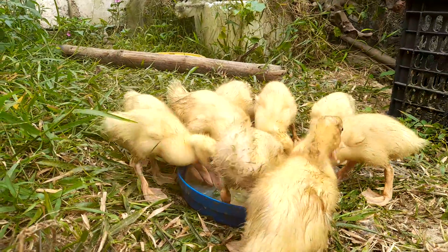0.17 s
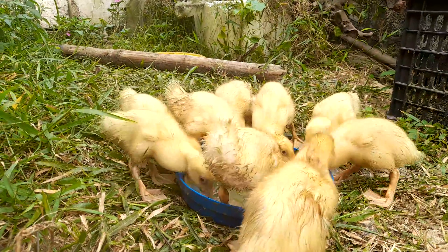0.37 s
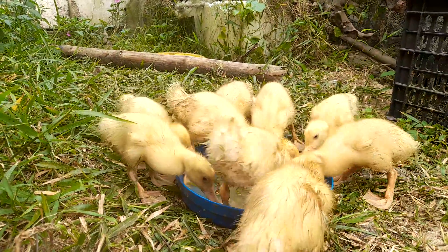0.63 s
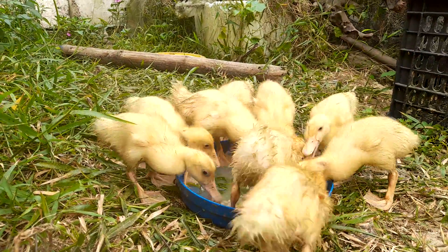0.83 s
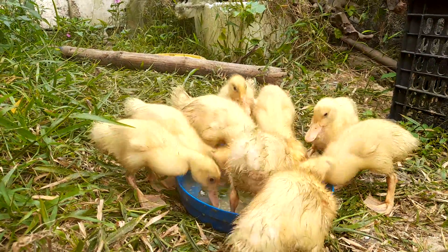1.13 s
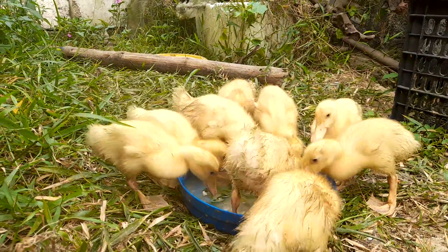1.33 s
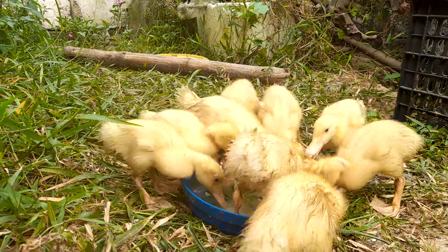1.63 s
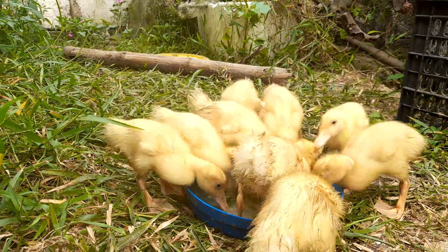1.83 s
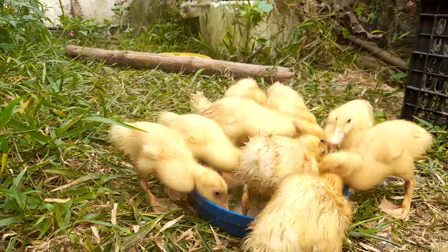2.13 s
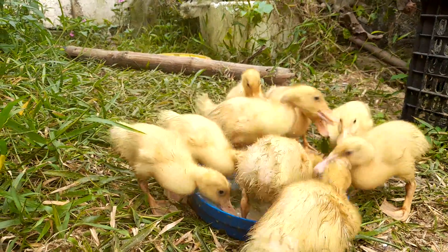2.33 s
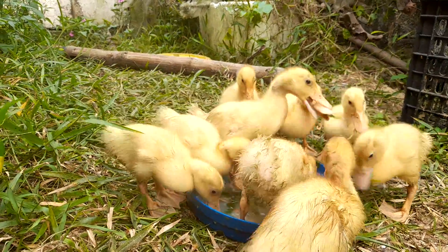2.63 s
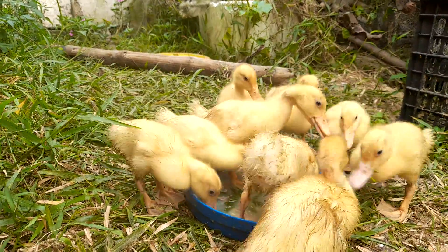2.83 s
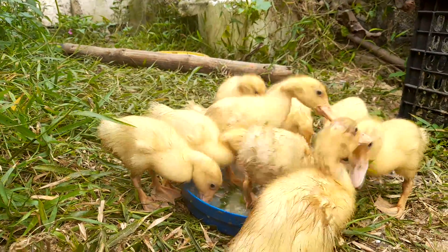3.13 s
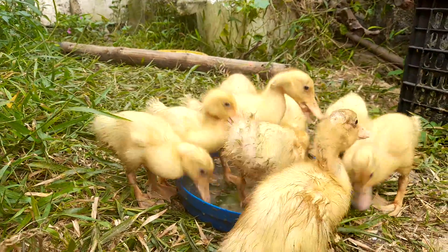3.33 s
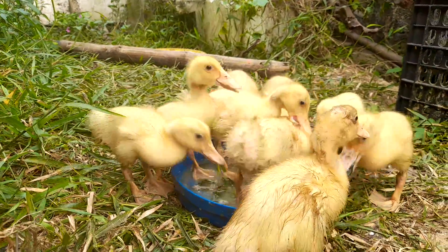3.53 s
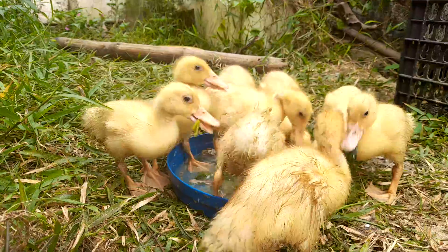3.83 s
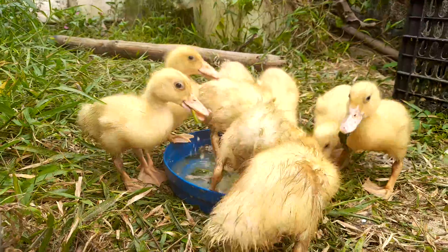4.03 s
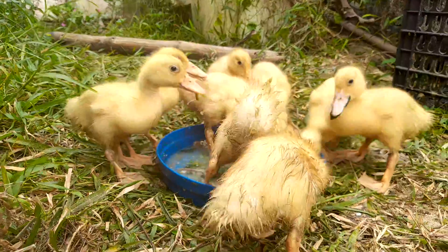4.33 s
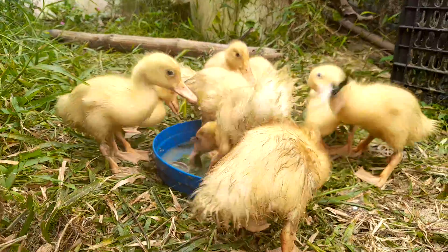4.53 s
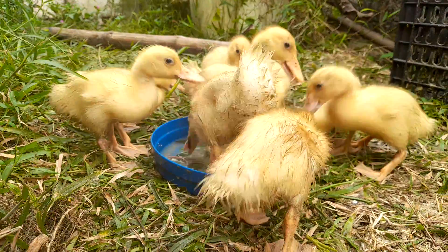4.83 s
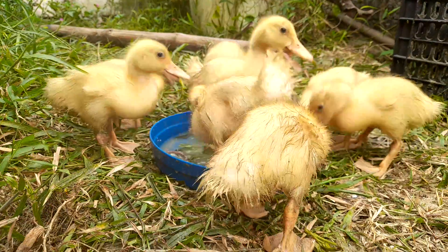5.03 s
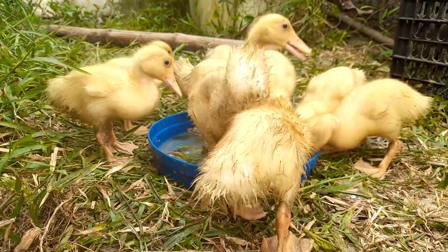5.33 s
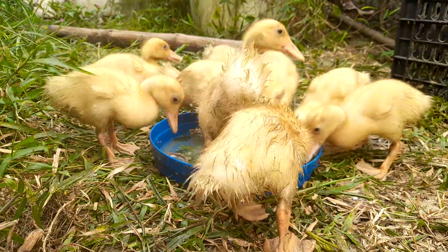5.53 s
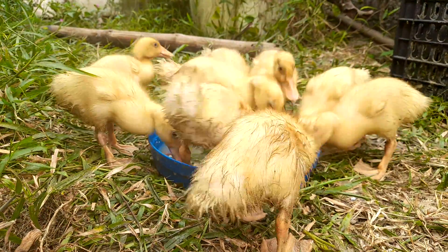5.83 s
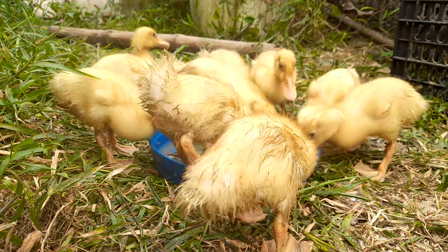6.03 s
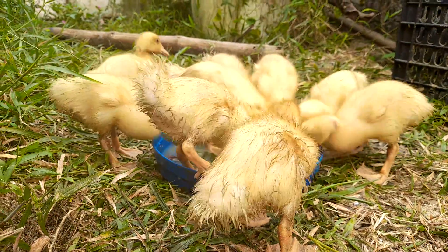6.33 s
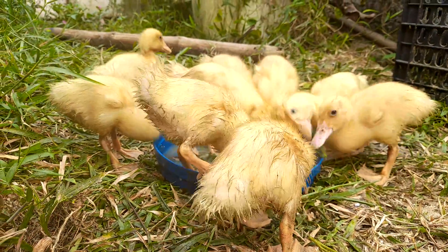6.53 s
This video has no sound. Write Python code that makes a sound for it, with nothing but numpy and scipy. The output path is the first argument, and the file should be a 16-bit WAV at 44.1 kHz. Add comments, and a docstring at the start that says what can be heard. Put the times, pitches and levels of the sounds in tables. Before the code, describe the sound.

From the start, a crowd of ducklings dabbles noisily in a plastic bowl about a metre from a stereo microphone. Dense, very short wet smacks and bright ticks mix with nibbling, fine spray, sloshing, light bowl knocks and small rising bubble plops. Between 0.6 and 1.0 s, five quick, thin two-voiced peeps chirp slightly to the right. The sloshing lessens after 1.3 s, and from about 2 to 3.2 s only sparse clicks and soft dabbling remain. Faint peeps come at 3.2 and 3.5 s, with a splashy plop near 3.4 s. Smacking grows again from 3.8 to 5 s, eases briefly, then two clearer peeps sound at 5.6 and 5.7 s amid renewed sloshing. Wet clicks and spray gather again at 6.4 to 6.7 s. Underneath lie faint outdoor hiss, low rumble, a distant wavering engine drone strongest near 5.8 s, and barely audible far animal calls.

```python
"""Wet bills smack and dabble close by: ducklings crowd round a plastic bowl of water on a lawn,
about a metre from a stereo microphone. Noise bursts ring the bills and bowl, grains of noise make the dabbling,
rising sines make bubbles plop, and paired whistles make the short two-voiced peeps.
Behind them lie a faint outdoor hiss, a few far animal calls, low rumble and the drone of a distant engine."""
import sys
import numpy as np
from scipy import signal
from scipy.fft import rfft, irfft, next_fast_len
from scipy.io import wavfile
from scipy.ndimage import uniform_filter1d

SR = 44100
rng = np.random.default_rng(int(sys.argv[2]) if len(sys.argv) > 2 else 0)


def pcm_store(signal):
    """Save signal as 16-bit PCM."""
    levels = np.round(np.clip(np.atleast_2d(signal), -1, 1) * 32767)
    wavfile.write(sys.argv[1], SR, levels.astype(np.int16).T)


N = 295029
TIME = np.arange(N) / SR

# Loud bill smacks; tick and knock levels are before the trims in smacks():
# start_s, hollow_level_db, hollow_pitch_hz, tick_level_db, bowl_knock_level_db, decay_ms
SMACK_EVENTS = [(.0314, -48, 3560, -43, -65, 0.9), (.0658, -35.5, 3720, -41, -57, 0.59),
                (.117, -66, 4100, -40, -65, 1.1), (.153, -45.5, 3140, -36.5, -46.5, 1.5),
                (.163, -45.5, 3400, -36, -54, 1), (.225, -46, 4000, -54, -66, 0.64),
                (.2506, -44.5, 2980, -41.5, -66, 1.6), (.2575, -44.5, 4200, -47, -73, 1.6),
                (.2976, -42.5, 4170, -47, -50, 2.1), (.3357, -56, 4450, -45, -52, 2.4),
                (.3541, -46.5, 3800, -36.5, -47, 1.3), (.3822, -40.5, 4000, -53, -58, 1.3),
                (.468, -49.5, 3850, -43, -67, 1.2), (.494, -37.5, 4080, -46, -51, .9),
                (.5314, -44.5, 3800, -53, -56, 1.2), (.5595, -43.5, 3900, -61, -57, 1.7),
                (.6767, -40.5, 3950, -39.5, -63, 1.3), (.6837, -42, 3840, -43.5, -71, 4.6),
                (.7573, -49, 2680, -70, -49, 1.6), (.782, -44, 3270, -48, -52, 1.5),
                (.7952, -55, 3810, -41, -69, 1.2), (.8437, -41, 4700, -38, -49, 2.3),
                (.8919, -45, 4100, -40, -55, 6.1), (.9296, -38, 3350, -44, -55, 1.3),
                (.9517, -52, 4650, -48, -74, 1.7), (1.0114, -64, 3290, -33, -53, 0.62),
                (1.0383, -34.5, 2950, -45, -45, .8), (1.0714, -36.5, 4000, -30.5, -51, 1.4),
                (1.1071, -43, 4370, -63, -68, 0.63), (1.1253, -53, 3630, -40, -52, .7),
                (1.152, -43.5, 3310, -36.5, -47.5, 2.4), (1.1839, -41, 3900, -62, -61, 0.74),
                (1.233, -45, 3300, -65, -55, 2.1), (1.2924, -68, 5340, -40, -59, 0.7),
                (1.3817, -55, 3390, -46.5, -61, .6), (1.4668, -62, 5020, -29.5, -64, .6),
                (1.523, -47.5, 3930, -34.5, -57, 0.42), (1.573, -76, 5680, -42, -68, .5),
                (1.625, -41, 4670, -37.5, -57, 0.47), (1.644, -56, 3800, -43, -60, .9),
                (1.6822, -75, 4570, -43.5, -59, .5), (1.709, -43, 3450, -63, -56, 4),
                (1.7254, -49, 3340, -44, -51.5, 0.58), (1.7365, -46.5, 2930, -34, -59, 0.77),
                (1.7685, -42.5, 3940, -50, -49, 6.9), (1.9143, -51, 3100, -51, -54, 3.6),
                (1.9602, -65, 4120, -42.5, -72, 1.9), (1.9927, -38.5, 3720, -63, -63, 0.7),
                (2.0228, -45.5, 4030, -48, -73, 3.2), (2.4593, -54.5, 4400, -48, -86, 6.9),
                (2.5223, -41.5, 3460, -47, -54.5, .9), (2.663, -51.5, 3850, -52, -61, 0.79),
                (2.7636, -48, 6360, -48, -60, 2.3), (2.9793, -47.5, 5900, -39.5, -71, 1.4),
                (3.0069, -44, 3500, -51, -55.5, 1.6), (3.1332, -51, 3150, -54, -78, 1.8),
                (3.347, -50, 3260, -46, -65, 3), (3.3635, -43, 2350, -50, -49, 2.2),
                (3.824, -44, 4500, -34, -54, .9), (3.9294, -45.5, 3320, -52, -59, 1.3),
                (3.98, -45.5, 3440, -53.5, -68, 9.6), (4.0365, -49.5, 4520, -53, -69, 1.9),
                (4.2194, -52, 5170, -49, -53, .8), (4.2547, -47.5, 4420, -48, -61, 1.6),
                (4.3315, -52, 3820, -37.5, -55, .4), (4.3946, -56, 5000, -43, -62, 7.1),
                (4.4904, -48, 4150, -61, -72, 2), (4.6186, -50, 3650, -42, -50, 1.3),
                (4.648, -42.5, 4040, -49, -50, 0.9), (4.677, -53, 4430, -44.5, -56, .7),
                (4.8344, -51, 3520, -55, -46.5, 0.9), (4.8657, -32.5, 4720, -37.5, -52, 0.37),
                (4.92, -40.5, 3100, -58, -66, 3), (4.958, -42, 5030, -44, -55.5, 10),
                (4.981, -39.5, 3650, -51, -48, 1.4), (5.1058, -50, 3880, -45.5, -54.5, 5),
                (5.131, -48, 4170, -56, -49, 1.5), (5.4055, -48, 4460, -56, -68, 1.2),
                (5.4754, -40.5, 5540, -49, -58, 1.5), (5.609, -33, 4930, -36.5, -48, 0.65),
                (5.624, -44, 4760, -60, -77, 1.1), (5.78, -45.5, 3900, -59, -55, 1.9),
                (5.7935, -48.5, 4270, -37, -70, 0.7), (5.8818, -52, 4320, -40, -77, 1.2),
                (5.9346, -38.5, 3860, -44, -57, 2.6), (6.0965, -44.5, 3800, -60, -69, 1.9),
                (6.1152, -36.5, 4000, -61, -76, 1.9), (6.2213, -48, 4040, -53, -52.5, 1.2),
                (6.3285, -48.5, 3880, -55, -72, 2.5), (6.441, -44, 4130, -52, -53, 21),
                (6.4735, -45, 3430, -42, -49, 1.2), (6.483, -36, 2880, -57, -65, .6),
                (6.491, -37.5, 3300, -48, -50, 7.8), (6.528, -64, 4930, -38.5, -58, 0.82),
                (6.6379, -38, 4400, -45, -57, 6.4)]
# Pitch of the wet ticks, finer once the brood has shifted round the bowl: time_s, pitch_hz
TICK_PITCH_CURVE = [(0, 10400), (1.1, 10400), (1.5, 9800), (4.3, 9800), (4.4, 11900), (6.69, 11900)]
# How busily the brood dabbles, before the trims in dabbling():
# time_s, slosh_level_db, nibble_level_db, spray_level_db
DABBLE_CURVE = [(0.0, -63, -55, -53.5), (0.43, -66.5, -57, -57.5), (0.74, -63, -52.5, -55.5),
                (0.95, -58, -53.5, -55), (1.36, -72, -57.5, -59.5), (1.64, -71, -59.5, -58),
                (2.03, -68.5, -61, -61), (2.35, -84, -68.5, -62.5), (3.26, -70.5, -62.5, -63.5),
                (3.71, -79, -70, -69), (4.13, -67, -59, -60), (4.58, -68, -56.5, -62),
                (4.77, -65.5, -60.5, -58), (5.16, -78.5, -66, -66), (5.4, -77.5, -63.5, -64.5),
                (5.7, -60, -55.5, -64.5), (6.39, -73, -62.5, -59.5), (6.69, -65.5, -53, -53)]
# Colour of the sloshing in the bowl: frequency_hz, level_db
SLOSH_COLOUR = [(250, 6), (500, -1.5), (800, 0), (1300, -1), (2000, 1), (3000, 5)]
# Colour of the nibbling in the bills: frequency_hz, level_db
NIBBLE_COLOUR = [(1200, -5), (2000, -1.5), (2800, 2.5), (3800, 4.5), (4700, -1), (5800, -5), (8000, -13.5)]
# Colour of the fine spray: frequency_hz, level_db
SPRAY_COLOUR = [(5000, -2), (6500, 3.5), (8700, -7), (9900, 1), (11500, -7), (14300, 0), (16000, -19)]
# Plops and sloshes in the bowl; splash is relative to the bubble, level is before the decay:
# start_s, level_db, starting_pitch_hz, decay_ms, splash_level_db
PLOP_EVENTS = [(.095, -41, 1100, 4.6, -3), (.36, -43.5, 1390, 10.4, 22), (.626, -42.5, 1136, 4.1, 1),
               (.752, -41, 880, 5, 5), (.784, -47, 850, 4.9, -13), (.888, -39, 670, 3.6, -6),
               (.893, -41.5, 298, 17.6, -3.5), (.93, -47, 450, 7.2, 8), (1.062, -45.5, 340, 11, 11),
               (1.14, -48, 1080, 16, 5), (1.902, -52.5, 690, 19, 23), (2.27, -45.5, 198, 10.3, 4),
               (3.362, -34, 1220, 2.5, 27), (3.895, -54, 560, 6.6, 16), (4.092, -43, 1210, 3.3, 3),
               (4.603, -38, 1080, 2.8, 17), (4.636, -46, 730, 5.9, 0), (4.64, -48, 420, 19, 23),
               (4.663, -52, 950, 17, 13), (5.693, -37.5, 993, 4.2, -15), (6.022, -44, 890, 6.3, 2.5),
               (6.038, -45, 1080, 6.1, -15), (6.49, -45, 1075, 8.5, 3), (6.629, -46.5, 1330, 12, 4)]
# Peeps; droop is the fall in pitch at both ends as a share of the top:
# start_s, top_s, end_s, top_pitch_hz, droop_share, level_db, second_to_first_pitch_ratio, second_level_db
PEEP_EVENTS = [(.579, .609, .641, 2770, .29, -38, 1.29, -5), (.694, .726, .762, 2850, .31, -32.5, 1.22, -8),
               (.818, .841, .900, 3100, .42, -33.3, 1.33, -10),
               (.841, .865, .898, 2940, .45, -37, 1.25, -15),
               (.971, .996, 1.023, 2970, .4, -36.5, 1.28, -12),
               (2.00, 2.02, 2.10, 2880, .14, -66, 1.3, -15), (2.07, 2.11, 2.19, 2260, .05, -69, 1.3, -15),
               (3.208, 3.230, 3.280, 2290, .22, -47, 1.6, -11),
               (3.480, 3.492, 3.556, 2740, .4, -49.5, 1.3, -14),
               (5.550, 5.579, 5.622, 2680, .38, -44.5, 1.28, -4),
               (5.705, 5.735, 5.773, 3000, .42, -39.5, 1.27, -2),
               (5.85, 5.89, 5.94, 2480, .05, -62, 1.2, -12), (6.11, 6.15, 6.25, 2830, .18, -61, 1.2, -14)]
# Faint far calls: start_s, length_s, start_pitch_hz, end_pitch_hz, level_db, roughness_0_to_1
FAR_CALL_EVENTS = [(2.551, 0.21, 1151, 975, -65, 0.27), (3.286, 0.24, 666, 540, -69, 0.14),
                   (5.608, 0.214, 636, 693, -70, .05), (5.633, 0.16, 495, 532, -65.5, 0.14)]
# Colour of the outdoor hiss: frequency_hz, level_db
AIR_COLOUR = [(250, 10), (400, -4), (700, -2.5), (1500, -12), (2300, -17), (3500, -2), (7000, -12),
              (10000, -4.5), (14000, -3), (15500, -15)]
# Colour of the low rumble: frequency_hz, level_db
RUMBLE_COLOUR = [(20, -30), (31, -26), (41, 7), (54, -5.5), (85, -3.5), (140, -8.5), (220, -13.5),
                 (320, -20), (520, -42.5)]
# Distant traffic, before the trims in outdoors(): time_s, rumble_level_db, drone_level_db
TRAFFIC_CURVE = [(0.0, -51.5, -63.5), (1.23, -53.5, -60), (1.6, -63, -62.5), (2.7, -62.5, -60.5),
                 (4.7, -56.5, -61.5), (5.2, -59.5, -60.5), (5.8, -56, -49.5), (6.32, -60, -61.5),
                 (6.69, -61, -56.5)]

# Stereo placing: level differences are left minus right
PEEP_PAN_DB, BILL_PAN_DB, BILL_PAN_SPREAD_DB = -7.5, -3.5, 1.5
LEFT_LAG_MS = 0.037
# Soft smacks fall at random, this far above the dabbling around them
SOFT_PER_S, SOFT_OVER_DB, SOFT_SPREAD_DB = 8, 7, 2
SOFT_HZ, SOFT_SCATTER, SOFT_DECAY_MS = 3940, .18, 1.2
TICK_SCATTER = .04  # spread of the tick's pitch, as a share
SPURTS_PER_S, SPURT_DB = 16, 2  # the bills work in short spurts
# A bubble's pitch climbs by this share of its start in each starting cycle, so small ones glide faster
RISE_PER_CYCLE = 0.0088
# Tiny bubbles burst at random among the bills
BUBBLES_PER_S, BUBBLE_HZ, BUBBLE_SCATTER, BUBBLE_CYCLES = 24, 3400, .24, 6
BUBBLE_OVER_DB, BUBBLE_SPREAD_DB, BUBBLE_SPLASH_DB = 11, 2.5, -1
DRONE_HZ = 122.6
TOP_HZ = 16000


def undb(db):
    """Decibels to gain."""
    return 10 ** (np.asarray(db) / 20)


def unit(x):
    """Scale to rms 1."""
    return x / np.sqrt(np.mean(x ** 2) + 1e-20)


def curves(table):
    """The columns of a table, joined by straight lines in time."""
    s, *columns = np.transpose(table)
    return [np.interp(TIME, s, column) for column in columns]


def colour(x, points):
    """Filter by a (Hz, dB) spectrum that falls away beyond its ends."""
    hz, db = np.transpose(points)
    size = next_fast_len(N)
    f = np.maximum(np.arange(size // 2 + 1) * SR / size, 1)
    ends = np.minimum(f / hz[0], 1) ** 2 * np.minimum(hz[-1] / f, 1) ** 2
    gains = ends * undb(np.interp(np.log(f), np.log(hz), db))
    return irfft(rfft(x, size) * gains, size)[..., :N]


def resonate(x, hz, q):
    """A resonance applied twice, for steep skirts."""
    b, a = signal.iirpeak(hz, q, fs=SR)
    once = signal.lfilter(b, a, x)
    return signal.lfilter(b, a, once)


def walk(rate):
    """Smooth random wander of rms near 1, with a fresh step this many times a second."""
    k = max(int(SR / rate), 2)
    steps = np.repeat(rng.standard_normal(N // k + 1), k)
    smooth = uniform_filter1d(uniform_filter1d(steps, k), k)
    return unit(smooth[:N])


def ears(width, size):
    """Noise for left and right: a common part plus an unrelated part."""
    common = rng.standard_normal(size)
    return (common + width * rng.standard_normal((2, size))) / np.hypot(1, width)


def pan(db):
    """Left and right gains for a level difference, left minus right."""
    return unit(undb(np.array([[db], [-db]]) / 2))


def add(out, s, sound):
    """Mix a sound in at time s."""
    i = int(s * SR)
    out[:, i:i + sound.shape[-1]] += sound[..., :N - i]


def smacks(rows, tick_trim_db=-1.0, knock_trim_db=-2, fizz_db=-9, fizz_spread_db=3,
           tail_db=-15, tail_ms=5, snap=1.0, width=1.0):
    """A water film snaps in the bill: a sharp burst and a spatter ring the bill, tiny bubbles and the bowl."""
    out = np.zeros((2, N))
    ms = np.arange(SR // 20) * 1000 / SR
    for s, hollow_db, hollow_hz, wet_db, bowl_db, decay_ms in rows:
        film, fizz, place = rng.standard_normal(3)
        tick_hz = np.interp(s, *np.transpose(TICK_PITCH_CURVE)) * np.exp(TICK_SCATTER * film)
        shape = np.exp(-ms / decay_ms) + undb(tail_db) * np.exp(-ms / tail_ms)
        # level dB, pitch Hz, sharpness Q
        parts = [(hollow_db, hollow_hz, 2.6),
                 (wet_db + tick_trim_db, tick_hz, 3.4),
                 (wet_db + fizz_db + fizz_spread_db * fizz, 14000, 3.0),
                 (bowl_db + knock_trim_db, 1550, 1.3)]
        sound = 0
        for db, hz, q in parts:
            # after the first millisecond the level jumps at random every 40 samples
            jumps = np.repeat(rng.standard_normal(len(ms)), 40)[:len(ms)]
            spatter = np.where(ms > 1, undb(4 * jumps), 1)
            burst = ears(width, size=len(ms)) * shape * spatter
            burst[:, 0] += snap
            sound = sound + undb(db) * unit(resonate(burst, hz, q))
        # each bill is in its own place, so its delay between the microphones differs
        lags = rng.integers(0, 2, 2)
        sound = np.array([np.pad(ear, (lag, 8 - lag)) for ear, lag in zip(sound, lags)])
        # levels hold for the first 10 ms, where nearly all the energy lies
        level = np.sqrt(10 / ms[-1])
        add(out, s, pan(BILL_PAN_DB + BILL_PAN_SPREAD_DB * place) * sound * level)
    return out


def soft_smacks():
    """Rows like those of SMACK_EVENTS, at loose intervals and as loud as the brood is busy."""
    slosh, nibble, spray = curves(DABBLE_CURVE)
    rows = []
    for k, chance in enumerate(rng.standard_normal((int(SOFT_PER_S * N / SR), 5))):
        s = np.clip((k + .5 + .5 * chance[0]) / SOFT_PER_S, 0, TIME[-1])
        around = np.array([np.interp(s, TIME, level) for level in (nibble, spray, slosh)])
        hollow_db, wet_db, bowl_db = around + SOFT_OVER_DB + SOFT_SPREAD_DB * chance[2:]
        hollow_hz = SOFT_HZ * np.exp(SOFT_SCATTER * chance[1])
        rows.append((s, hollow_db, hollow_hz, wet_db, bowl_db, SOFT_DECAY_MS))
    return rows


def patter(pitches, rate, spread_db, cycles, bed, bunch):
    """Wet grains in bunches ring every pitch, each at a random level, and decay over some cycles on a thin fizz."""
    hits = np.flatnonzero(rng.random(N) < rate / SR * bunch)
    size_db = spread_db * np.minimum(rng.exponential(size=len(hits)), 2)
    out = 0
    for hz in pitches:
        kicks = np.zeros(N)
        kicks[hits] = undb(size_db + rng.uniform(-9.5, 14.6, len(hits))) ** 2
        power = signal.lfilter([1], [1, -np.exp(-2 * hz / (cycles * SR))], kicks)
        grains = ears(1.0, size=N) * np.sqrt(power / power.mean() + bed)
        out = out + np.sqrt(hz) * unit(resonate(grains, hz, 3.0))
    return out


def dabbling(slosh_trim_db=3, nibble_trim_db=1, spray_trim_db=4, bunch_db=2.5):
    """Many bills sieve the water at once: sloshing in the bowl, nibbling in the bills, fine spray."""
    # one shared run of spurts moves all three levels
    slosh, nibble, spray = curves(DABBLE_CURVE) + SPURT_DB * walk(SPURTS_PER_S)
    bunch = undb(bunch_db * np.clip(walk(70), -2, 1)) ** 2
    bunch = bunch / bunch.mean()
    water = patter([397, 560, 770, 1188, 1873], rate=120, spread_db=7.5, cycles=7.2, bed=0.15, bunch=bunch)
    bills = patter([2270, 3060, 3970, 4680, 5880], rate=130, spread_db=6.5, cycles=16.7, bed=0.06, bunch=bunch)
    drops = patter([8200, 10640, 11700, 15700], rate=150, spread_db=9.5, cycles=34, bed=0.062, bunch=bunch)
    sloshing = undb(slosh + slosh_trim_db) * unit(colour(water, SLOSH_COLOUR))
    nibbling = undb(nibble + nibble_trim_db) * unit(colour(bills, NIBBLE_COLOUR))
    spraying = undb(spray + spray_trim_db) * unit(colour(drops, SPRAY_COLOUR))
    return sloshing + pan(-5.5) * nibbling + pan(-1.8) * spraying


def plops(rows, rise_ms=1.0):
    """A trapped bubble rings and rises in pitch inside a short splash."""
    out = np.zeros((2, N))
    t = np.arange(SR // 10) / SR
    ms = 1000 * t
    for s, db, hz, decay_ms, splash_db in rows:
        rising_hz = hz * (1 + RISE_PER_CYCLE * hz * t)
        bubble = np.sqrt(2) * np.sin(2 * np.pi * np.cumsum(rising_hz) / SR)
        splash = undb(splash_db) * unit(resonate(ears(0.87, size=len(ms)), hz, 1.0))
        shape = (1 - np.exp(-ms / rise_ms)) * np.exp(-ms / decay_ms)
        add(out, s, undb(db) * unit(bubble + splash) * shape)
    return out


def bubbles():
    """Rows like those of PLOP_EVENTS for tiny bubbles, their level following the nibbling around them."""
    nibble = curves(DABBLE_CURVE)[1]
    rows = []
    for k, chance in enumerate(rng.standard_normal((int(BUBBLES_PER_S * N / SR), 3))):
        s = np.clip((k + chance[0]) / BUBBLES_PER_S, 0, TIME[-1])
        hz = BUBBLE_HZ * np.exp(BUBBLE_SCATTER * min(chance[1], 1))
        db = np.interp(s, TIME, nibble) + BUBBLE_OVER_DB + BUBBLE_SPREAD_DB * chance[2]
        decay_ms = 1000 * BUBBLE_CYCLES / hz
        rows.append((s, db, hz, decay_ms, BUBBLE_SPLASH_DB))
    return rows


def peeps(quaver=.012, flutter_db=2.5, overtone_db=-28, rasp_db=-17, focus=.4, edge=.28, bend=1.6):
    """Both sides of the syrinx whistle an arch; the second, higher side fades out towards the ends."""
    out, waver = np.zeros((2, N)), walk(350)
    # flutter partly shared by the two channels
    throb = walk(270) + np.array([walk(270), walk(110)])
    for start, top, end, top_hz, droop, db, ratio, second_db in PEEP_EVENTS:
        span = (TIME >= start) & (TIME < end)
        arch = np.interp(TIME[span], [start, top, end], [-1, 0, 1])
        hz = top_hz * (1 - droop * np.abs(arch) ** bend)
        phase = 2 * np.pi * np.cumsum(hz * (1 + quaver * waver[span])) / SR
        # loudest at the top, thin on the way up and down
        push = np.exp(-(arch / focus) ** 2)
        effort = (edge + (1 - edge) * push) * np.sqrt(np.maximum(1 - arch ** 4, 0))
        first = np.sin(phase) + undb(overtone_db) * np.sin(2 * phase)
        # the two sides beat against each other and throw off a weak sideband
        sideband = 0.18 * np.sin((2 * ratio - 1) * phase)
        second = undb(second_db) * (1 - arch ** 4) * (np.sin(ratio * phase) + sideband)
        rasp = undb(rasp_db) * unit(resonate(ears(0.9, size=len(phase)), 2670, 2.0))
        level = undb(db + flutter_db * (1 - push) * throb[:, span])
        voice = np.sqrt(2) * (first + second + rasp) * effort * level
        add(out, start, pan(PEEP_PAN_DB) * voice)
    return out


def yard(x, wet_db=-13, t60=0.14, far_db=-25, far_t60=.5):
    """Ground, bowl and bodies scatter a short tail; a wall gives a fainter, longer one (t60 in seconds)."""
    t = np.arange(SR // 2) / SR
    echo = 0
    tails = [rng.standard_normal((2, len(t))) * undb(-60 * t / d) * (t > .002) for d in (t60, far_t60)]
    for db, tail in zip((wet_db, far_db), tails):
        echo = echo + undb(db) * tail / np.sqrt(np.sum(tail ** 2) / 2)
    echo = signal.sosfilt(signal.butter(1, 7000, fs=SR, output="sos"), echo)
    return x + signal.fftconvolve(x, echo, axes=1)[:, :N]


def ports(x):
    """Sound from the right of centre reaches the left microphone a little later."""
    size = next_fast_len(N + 64)
    f = np.arange(size // 2 + 1) * SR / size
    turn = np.exp(-2j * np.pi * f * LEFT_LAG_MS / 1000)
    left = irfft(rfft(x[0], size) * turn, size)[:N]
    return np.array([left, x[1]])


def far_calls(waver=0.0207, overtone_db=-5):
    """Faint calls from far away; a fast scatter of the pitch makes them hoarse."""
    out, drift, scatter = np.zeros((2, N)), walk(40), walk(1100)
    for start, length, start_hz, end_hz, db, rough in FAR_CALL_EVENTS:
        span = (TIME >= start) & (TIME < start + length)
        part = (TIME[span] - start) / length
        glide_hz = start_hz + (end_hz - start_hz) * part
        hz = glide_hz * (1 + waver * drift[span] + rough * scatter[span])
        phase = 2 * np.pi * np.cumsum(hz) / SR
        # the overtone lies two octaves up
        voice = np.sin(phase) + undb(overtone_db) * np.sin(4 * phase)
        add(out, start, undb(db) * unit(voice * np.sin(np.pi * part)))
    return out


def outdoors(air_db=-67, rumble_trim_db=1, drone_trim_db=-2, throb_db=-4):
    """Faint coloured-noise hiss, a low rumble and the wavering drone of a far engine."""
    rumble, drone = curves(TRAFFIC_CURVE)
    air = undb(air_db + 3.2 * walk(8.6)) * unit(colour(ears(1.0, size=N), AIR_COLOUR))
    # the deepest rumble swells, the murmur above it stays even
    low = unit(colour(ears(0.43, size=N), RUMBLE_COLOUR))
    deep = signal.sosfiltfilt(signal.butter(2, 100, fs=SR, output="sos"), low)
    murmur = undb(-57.5) * (low - deep)
    road = undb(rumble + rumble_trim_db) * deep + murmur
    # the drone is a wavering sine with noise throbbing round 80 Hz beneath it
    phase = 2 * np.pi * np.cumsum(DRONE_HZ * (1 + 0.0353 * walk(22))) / SR
    throb = unit(resonate(ears(0.25, size=N), 80, 1.1))
    tone = unit(np.sin(phase) * undb(2.8 * walk(17)))
    engine = undb(drone + drone_trim_db) * (tone + undb(throb_db) * throb)
    return air + pan(0.2) * (road + engine)


def scene():
    """The brood at the bowl, in the open air."""
    background, water = outdoors(), dabbling()
    voices = peeps() + far_calls()
    bowl = smacks(SMACK_EVENTS + soft_smacks()) + plops(PLOP_EVENTS + bubbles())
    return ports(yard(voices + bowl) + water) + background


def record(dry):
    """The recorder cuts the top with a steep low-pass."""
    return signal.sosfilt(signal.ellip(8, .2, 70, TOP_HZ, fs=SR, output="sos"), dry)


dry = scene()
out = record(dry)
pcm_store(out)
```